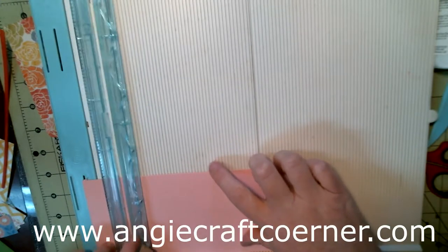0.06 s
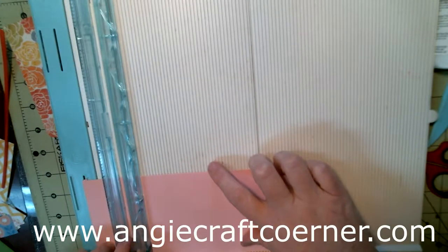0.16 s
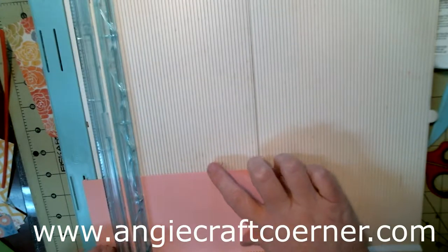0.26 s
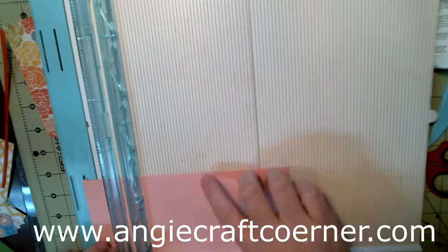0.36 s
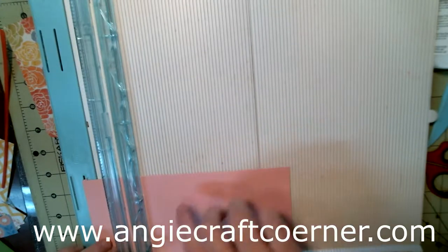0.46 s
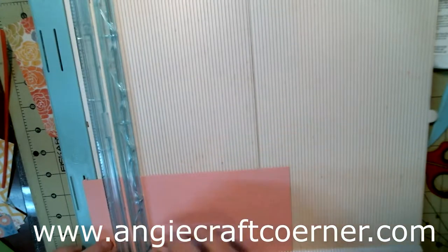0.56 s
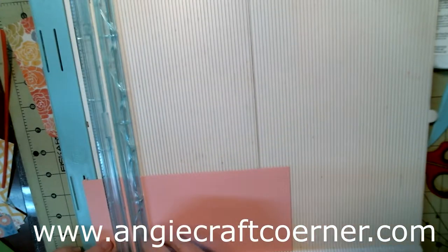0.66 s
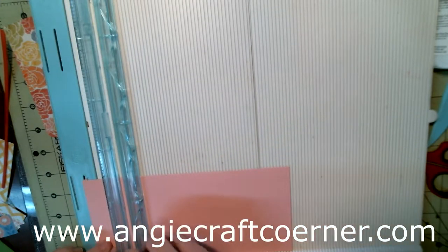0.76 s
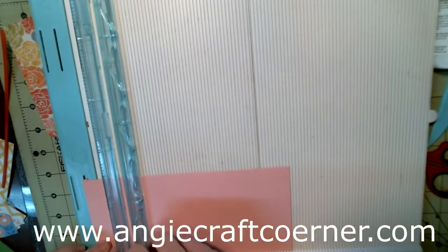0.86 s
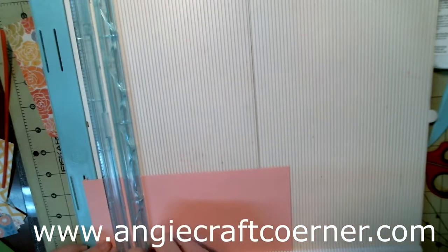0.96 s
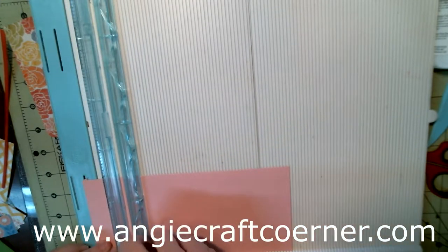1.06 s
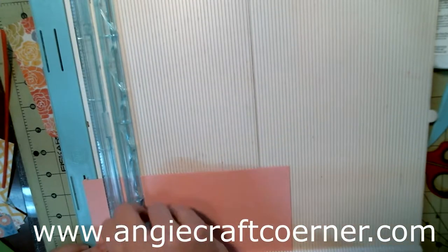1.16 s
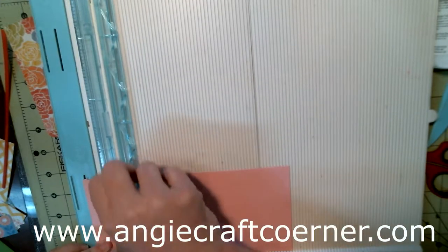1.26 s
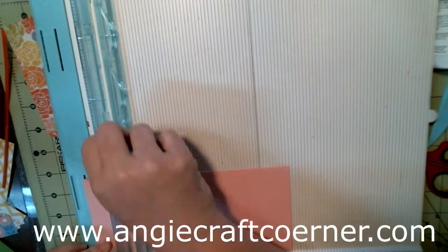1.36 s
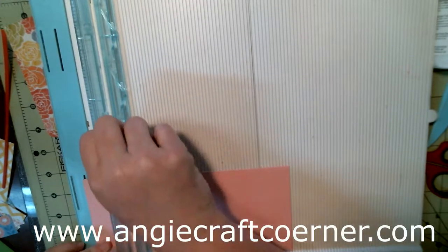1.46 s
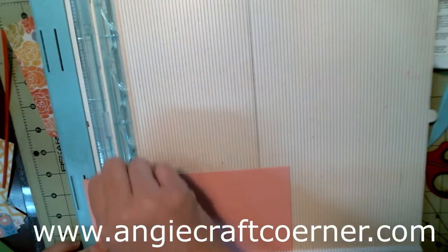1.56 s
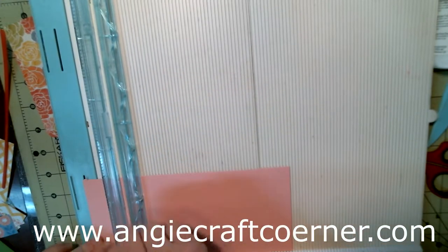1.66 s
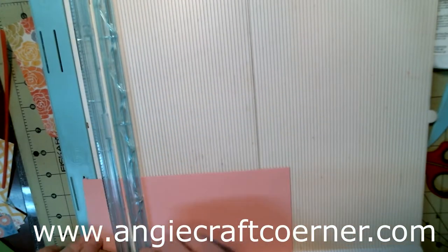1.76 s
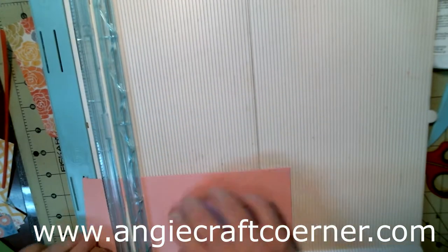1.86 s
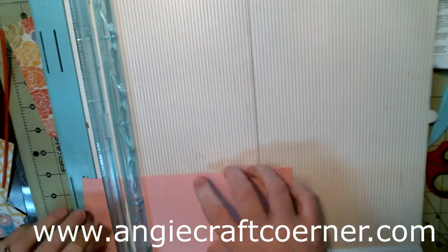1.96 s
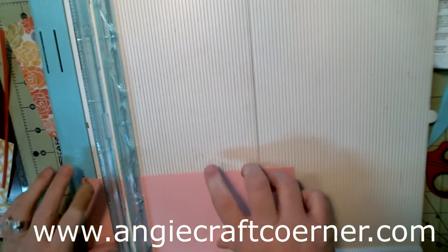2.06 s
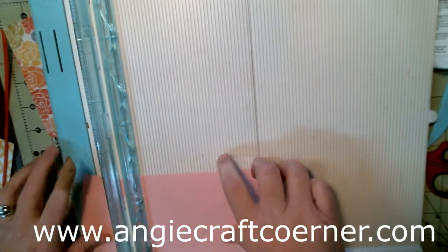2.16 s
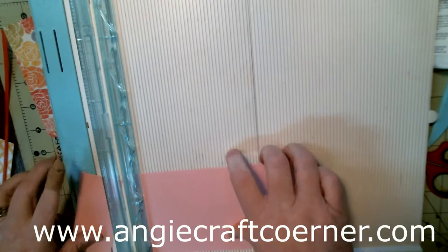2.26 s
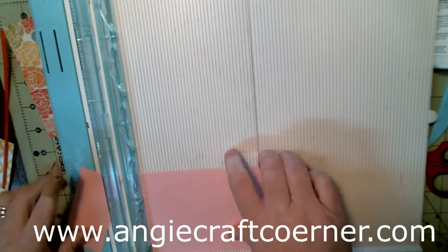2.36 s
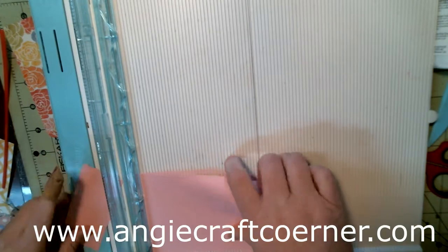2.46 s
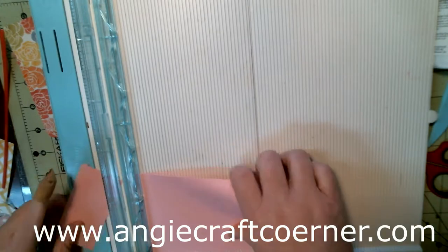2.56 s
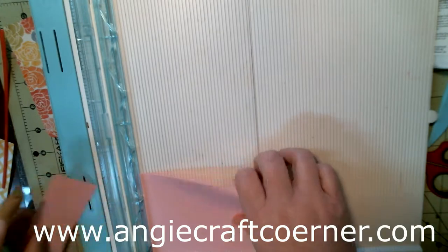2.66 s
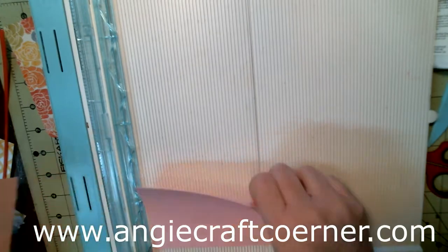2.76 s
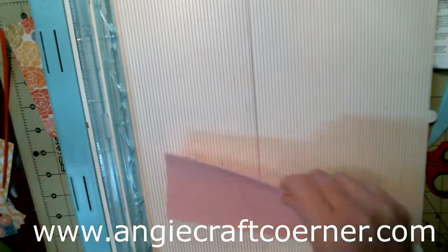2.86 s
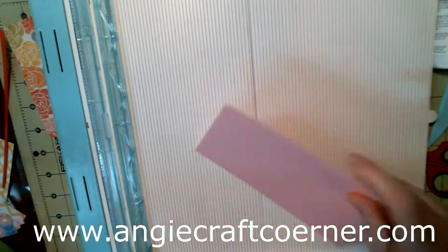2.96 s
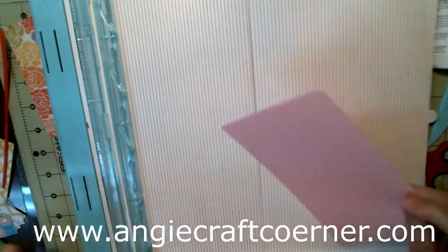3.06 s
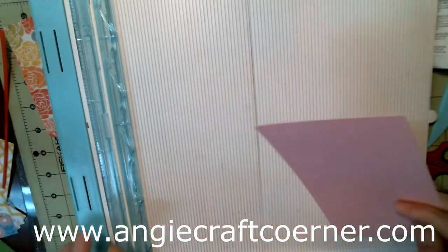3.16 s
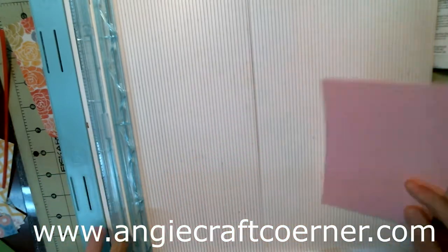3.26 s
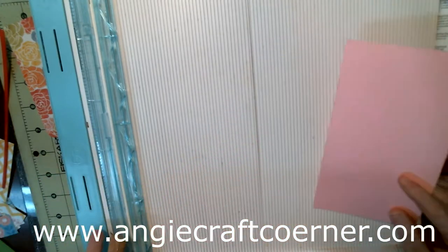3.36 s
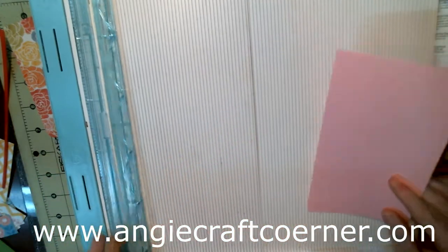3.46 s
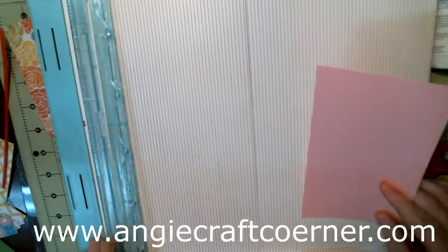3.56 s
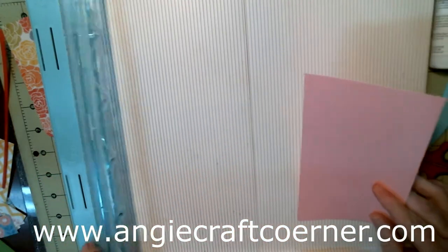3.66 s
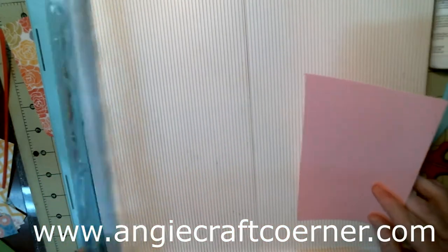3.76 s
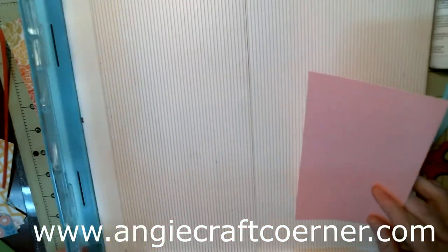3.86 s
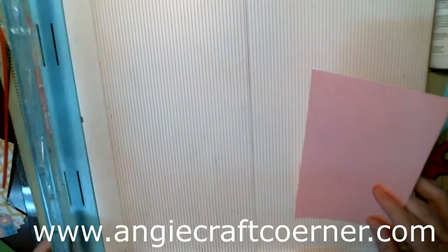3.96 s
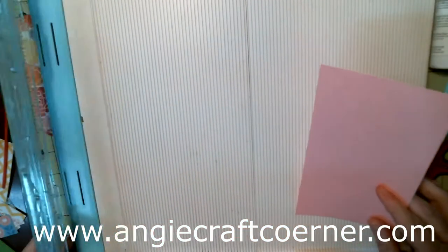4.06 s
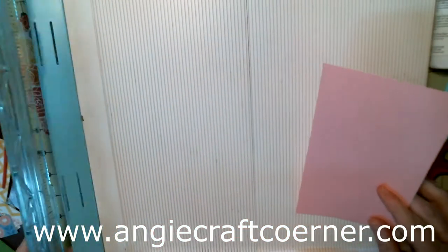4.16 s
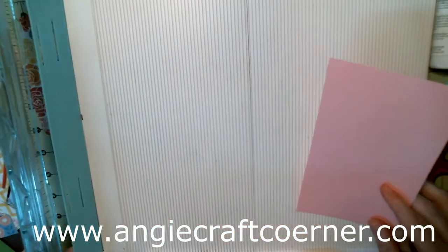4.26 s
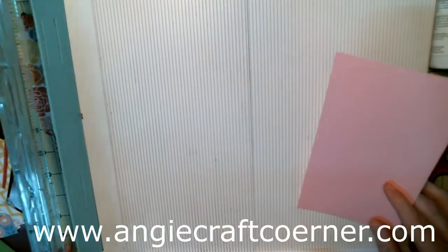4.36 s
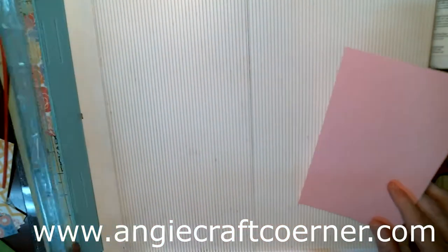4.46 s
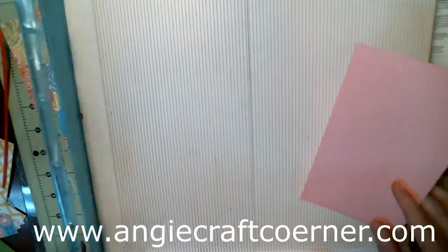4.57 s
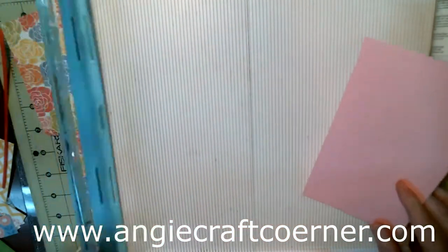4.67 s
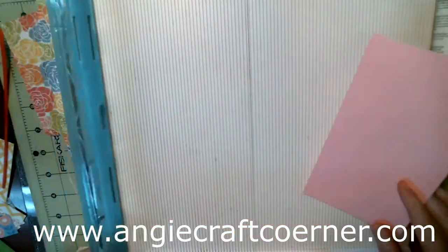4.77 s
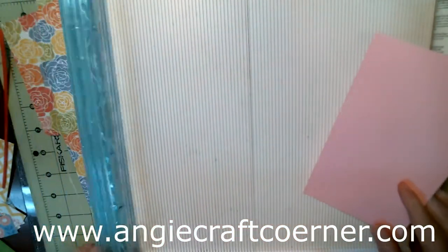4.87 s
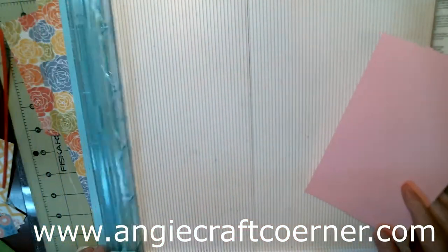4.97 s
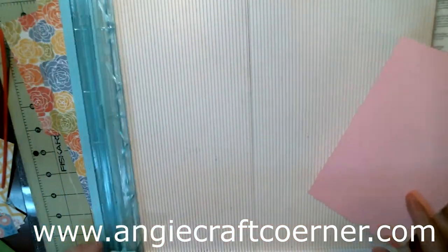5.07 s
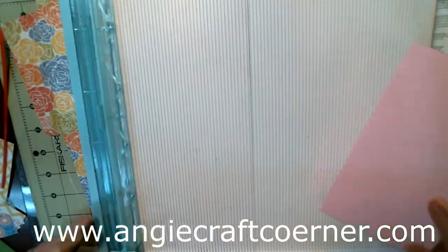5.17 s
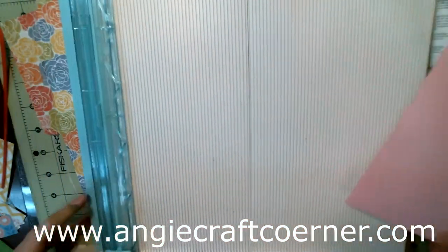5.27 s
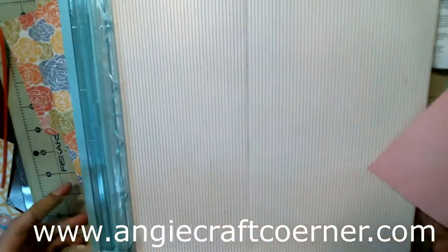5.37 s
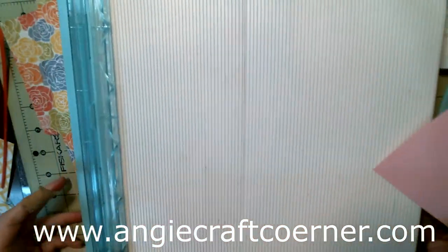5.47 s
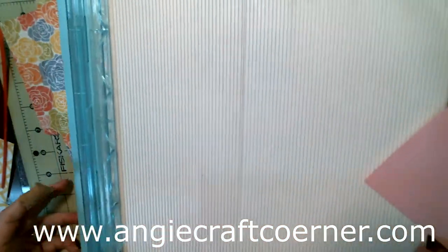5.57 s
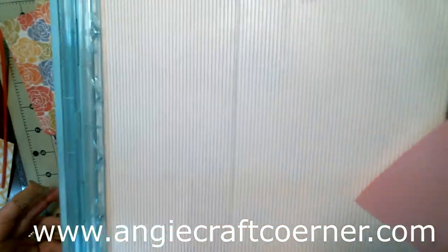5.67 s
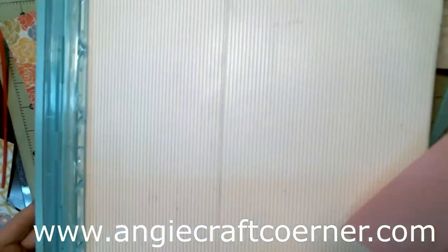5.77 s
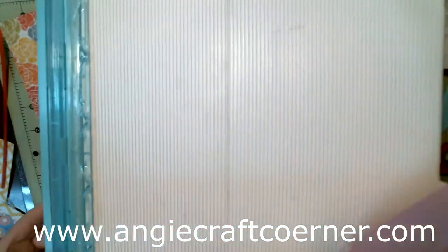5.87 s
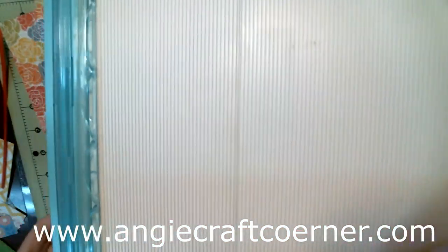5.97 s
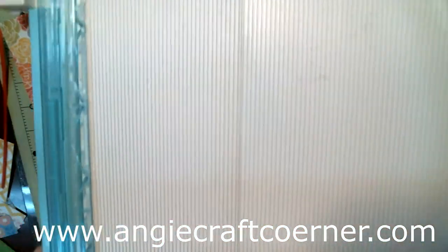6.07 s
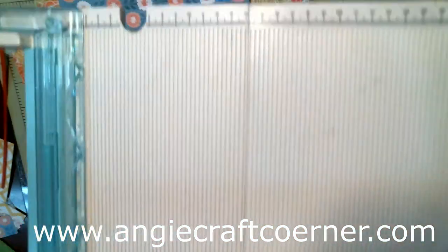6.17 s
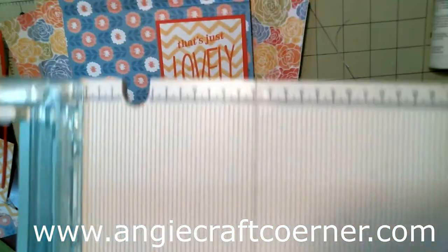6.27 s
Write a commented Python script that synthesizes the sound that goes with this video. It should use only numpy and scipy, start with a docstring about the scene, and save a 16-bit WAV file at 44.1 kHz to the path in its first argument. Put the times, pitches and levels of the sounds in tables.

```python
"""A craft table in a dry room, a plastic paper trimmer on it, a small microphone close by.
A low electric hum lies under taps of fingers, card and plastic, which sound board, clack and edge tick.
A blade rips through cardstock as clumped tiny slips ringing the rail, and is pushed back against its stop.
Hands slide the card away (swelling strokes of friction), the trimmer's arm flops open and claps shut
(spike, rattle and room through ringing modes), and the board is nudged aside with low, padded bumps."""
import sys
import numpy as np
from scipy import signal
from scipy.fft import rfft, irfft, next_fast_len
from scipy.io import wavfile
from scipy.ndimage import map_coordinates

SR = 44100
rng = np.random.default_rng(int(sys.argv[2]) if len(sys.argv) > 2 else 0)


def wav_record(signal):
    """Record a signal, one row per channel, as 16-bit PCM in the file named by sys.argv[1]."""
    frames = np.transpose(np.atleast_2d(signal))
    bounded = np.clip(frames, -1, 1)
    # unit amplitude maps onto the largest positive 16-bit level
    quanta = np.round(bounded * 32767).astype(np.int16)
    wavfile.write(sys.argv[1], SR, quanta)


N = 278579
TIME = np.arange(N) / SR
HIT = np.arange(SR // 4) / SR  # clock of one short blow


def amp(db):
    """Decibels to gain."""
    return 10 ** (np.asarray(db) / 20)


def unit(x):
    """Scale to rms 1."""
    return x / np.sqrt(np.mean(x ** 2) + 1e-20)


def blow_unit(x):
    """Scale a blow to the energy of 20 ms at rms 1."""
    return x / np.linalg.norm(x) * np.sqrt(SR / 50)


def along(points, hz):
    """Read (f/Hz, value) points on a log frequency axis."""
    f, value = np.transpose(points)
    return np.interp(np.log(hz + 1), np.log(f + 1), value)


def wobble(rate, size=N):
    """A smooth random curve, rate knots a second."""
    knots = rng.standard_normal(int(size * rate / SR) + 4)
    return map_coordinates(knots, [TIME[:size] * rate])


def colour(x, spectrum, modes=()):
    """Minimum-phase filter: a broad spectrum lifted by narrow resonances, ringing only after the blow."""
    size = 2 * next_fast_len(len(x) // 2 + 4096)
    hz = np.fft.rfftfreq(size, 1 / SR)
    gain = amp(along(spectrum, hz))
    for centre, width, lift_db in modes:
        resonance = 1 / (1 + (2 * (hz - centre) / width) ** 2)
        gain = gain * np.sqrt(1 + (amp(lift_db) ** 2 - 1) * resonance)
    # folding the cepstrum onto positive time makes the filter causal
    cepstrum = irfft(np.log(gain + 1e-6))
    cepstrum[1:size // 2] *= 2
    cepstrum[size // 2 + 1:] = 0
    response = np.exp(rfft(cepstrum))
    return irfft(rfft(x, size) * response)[:len(x)]


def add(track, s, sound):
    """Mix a sound into the track at time s."""
    part = track[round(s * SR):][:len(sound)]
    part += sound[:len(part)]


def burst(t60, rise=1e-5):
    """Dying noise of energy 1."""
    envelope = (1 - np.exp(-HIT / rise)) * np.exp(-np.log(1000) * HIT / t60)
    x = rng.standard_normal(len(HIT)) * envelope
    return x / np.linalg.norm(x)


def contact(rise, t60, rattle_db, room_db):
    """One spike, the chatter of the touching parts, and the small room's answer."""
    rattle = amp(rattle_db) * burst(t60, rise)
    room = amp(room_db) * burst(t60=.125, rise=.002)
    x = rattle + room
    x[0] += 1
    return x


def friction(size, rate, spread_db, clump_db, ring_db):
    """Tiny slips of random size come in clumps and ring the surface briefly."""
    slips = (rng.random(size) < rate / SR) * rng.standard_normal(size)
    clumps = clump_db * wobble(rate=110, size=size)
    slips = slips * amp(spread_db * rng.standard_normal(size) + clumps)
    ring = contact(rise=.0002, t60=.012, rattle_db=ring_db, room_db=-3)
    return signal.fftconvolve(slips, ring)[:size]


# One rubbed patch's resonance: offset from centre [half widths], level/dB
PATCH_SHAPE = [(-4, -48), (-2, -17), (-1, -4), (0, 0), (1, -5), (2, -21), (4, -56)]


def hump(centre_hz, octaves):
    """The spectrum of a rubbed patch: one broad resonance, half width in octaves."""
    return [(centre_hz * 2 ** (step * octaves), level) for step, level in PATCH_SHAPE]


# Modes of the trimmer's base, under strokes and taps alike: f/Hz, width/Hz, lift/dB
BASE_MODES = [(483, 30, 7), (615, 35, 8), (726, 30, 6), (852, 35, 5), (1124, 50, 6), (1250, 50, 6)]


def stroke(length, spectrum, crest, swell):
    """A stroke speeds up to its crest (a share of its length) and slows, rasping through the spectrum."""
    phase = np.interp(TIME[:SR // 2] / length, [0, crest, 1], [0, 1, 0])
    speed = np.sin(np.pi / 2 * phase) ** swell
    slips = friction(SR // 2, rate=2800, spread_db=3.8, clump_db=3, ring_db=0)
    return speed * unit(colour(slips, spectrum, BASE_MODES))


# Room tone at the microphone: f/Hz, level/dB per Hz
ROOM_TONE = [(25, -31), (60, -21), (90, -8), (140, -1), (200, -3), (250, -1), (340, -8), (520, -8),
             (780, -9), (1200, -17), (1800, -22), (3200, -29), (8000, -39), (15500, -49)]
HUM_HZ = 109.6


def background(air_db=-68, hum_db=-67.7):
    """Dull room noise and a hum slightly unsteady in pitch and level."""
    phase = 2 * np.pi * np.cumsum(HUM_HZ + .9 * wobble(rate=6)) / SR
    hum = unit(np.sin(phase) * amp(1.15 * wobble(rate=7)))
    air = unit(colour(rng.standard_normal(N), ROOM_TONE))
    return amp(hum_db) * hum + amp(air_db) * air


# Light taps of fingers, card and plastic, close by:
# t/s, clack level/dB, clack pitch f/Hz, board level/dB re clack, clack t60/s
LIGHT_TAPS = [(.048, -67, 3000, -7, .05), (.101, -55, 5200, -16, .025), (.113, -56, 2600, -6, .07),
              (.603, -70, 3700, 2, .07), (.734, -56, 3800, 3, .03), (1.371, -41, 1850, -12, .05),
              (1.524, -42, 3200, -29, .023), (1.63, -70, 5800, -6, .04), (1.711, -56, 2700, -8, .08),
              (1.778, -52, 1700, 4, .115), (1.870, -45.5, 2700, -2, .07), (2.158, -54, 2300, -7, .06),
              (2.279, -54, 3900, -15, .06), (2.389, -57, 2300, -12, .06), (2.409, -46, 2300, -13, .035),
              (2.95, -53, 4300, -11, .035), (3.048, -59, 1700, 5, .06), (3.184, -41.5, 3200, -33, .018),
              (3.221, -49.5, 2600, -24, .06), (3.574, -62, 1750, -5, .09), (3.932, -53, 1750, 7, .06),
              (3.980, -60, 2700, -4, .09), (4.009, -57, 1900, -3, .08), (4.383, -39, 2400, -12, .025),
              (4.992, -54.5, 2400, -2, .09), (5.205, -66, 2600, -5, .08), (5.227, -63.5, 5000, -7, .06),
              (5.455, -51, 3200, -1, .05), (5.474, -55, 2100, 5, .05), (5.541, -59.5, 4200, -7, .05),
              (6.111, -75, 6000, -2, .06)]
# The board under a tap: f/Hz, level/dB per Hz
BOARD_COLOUR = [(100, -42), (250, -20), (400, -16), (520, -4), (630, 0), (800, -1), (950, -2), (1150, -8),
                (1700, -28), (4000, -70)]
# The clack of plastic and card: f [multiple of its pitch], level/dB per Hz
CLACK_COLOUR = [(.2, -45), (.42, -14), (.65, -3), (1, 0), (1.45, -5), (2.1, -13), (3.2, -32), (6, -70)]
# The thin tick of an edge: f/Hz, level/dB per Hz
EDGE_COLOUR = [(2500, -45), (5000, -6), (6800, 0), (9500, -1), (11500, -10), (13500, -24), (16000, -46)]
# A higher tap has more edge tick: dB re the clack at a reference pitch, and growth with pitch
EDGE_DB, EDGE_REF_HZ, EDGE_DB_PER_OCTAVE = -11.5, 3000, 12
# A slower tap skids more as it lands: dB re the clack at a reference t60, and growth with t60
SKID_DB, SKID_REF_S, SKID_DB_PER_DOUBLING = -11, .05, 6
SKID_LEAD_S, SKID_S = .035, .085  # start ahead of the tap, length


def taps(softness=.018):
    """Long touches swell slower and skid more; board, clack and edge tick each die sooner than the last."""
    track = np.zeros(N)
    for s, db, pitch_hz, board_db, t60 in LIGHT_TAPS:
        clack = [(pitch_hz * multiple, level) for multiple, level in CLACK_COLOUR]
        edge_db = EDGE_DB + EDGE_DB_PER_OCTAVE * np.log2(pitch_hz / EDGE_REF_HZ)
        voices = ((BOARD_COLOUR, board_db, 1.3 * t60), (clack, 0, t60), (EDGE_COLOUR, edge_db, .7 * t60))
        for voice, share_db, life in voices:
            touch = contact(softness * life, life, rattle_db=11, room_db=2.5)
            add(track, s, amp(db + share_db) * blow_unit(colour(touch, voice, BASE_MODES)))
        skid_db = SKID_DB + SKID_DB_PER_DOUBLING * np.log2(t60 / SKID_REF_S)
        skid = stroke(SKID_S, clack, crest=.6, swell=2.6)
        add(track, s - SKID_LEAD_S, amp(db + skid_db) * skid)
    return track


# Skin and card brushing over paper: start t/s, length/s, level/dB
PAPER_BRUSHES = [(.46, .12, -68), (1.19, .28, -55.5), (1.60, .13, -65), (1.72, .11, -62.5), (1.83, .2, -63),
                 (2.17, .11, -61), (2.26, .31, -56.5)]
# Their hiss: f/Hz, level/dB per Hz
BRUSH_HISS = [(500, -45), (1500, -25), (3500, -17), (5500, -11), (7800, -1), (9800, 0), (12000, -8),
              (15500, -20)]
# The slider runs back, the card drags out and settles, the arm lifts, turns and seats, the board shifts:
# start t/s, length/s, level/dB, centre f/Hz, half width/octaves
DRAGGED_EDGES = [(.475, .06, -68, 2600, .5), (1.21, .25, -57.5, 3100, .7), (1.275, .055, -59, 1580, .15),
                 (2.02, .22, -51, 2500, .95), (2.2, .14, -63, 3400, .9), (2.42, .11, -57, 4700, .4),
                 (2.45, .33, -72, 3600, 1), (2.94, .058, -54, 3000, .9), (3.37, .065, -56, 1400, .7),
                 (3.868, .11, -54, 1300, .7), (4.345, .05, -55, 2400, .8), (4.58, .13, -72, 3300, .45),
                 (4.703, .06, -36, 2000, 1.2), (5.41, .135, -54, 3100, .6), (5.57, .1, -69, 2000, .7),
                 (6.14, .08, -73, 3600, .35)]
# Low, narrow rubs of pressing fingertips and of the nudged board:
# middle t/s, length/s, level/dB, centre f/Hz
LOW_RUBS = [(1.689, .06, -55, 680), (1.85, .06, -59, 660), (1.975, .045, -54, 610),
            (2.072, .11, -53.5, 720), (5.365, .09, -55, 260), (5.482, .1, -46.5, 440),
            (5.997, .04, -57, 650)]


def slides():
    """Flat brushes hiss, dragged edges rasp in the middle, fingertips and the nudged board rub low."""
    track = np.zeros(N)
    for start, length, db in PAPER_BRUSHES:
        add(track, start, amp(db) * stroke(length, BRUSH_HISS, crest=.55, swell=2.1))
    for start, length, db, centre_hz, octaves in DRAGGED_EDGES:
        add(track, start, amp(db) * stroke(length, hump(centre_hz, octaves), crest=.46, swell=1.9))
    for middle, length, db, centre_hz in LOW_RUBS:
        rub = stroke(length, hump(centre_hz, octaves=.34), crest=.45, swell=2.2)
        add(track, middle - length / 2, amp(db) * rub)
    return track


# The cutting stroke, pressed hardest just before the blade leaves the card: t/s, level/dB
CUT_LEVEL = [(0.68, -86), (0.726, -62), (0.734, -44), (0.8, -49), (0.896, -42), (0.994, -41), (1.024, -60),
             (1.068, -58), (1.098, -80), (1.12, -75)]
# Tearing fibres: f/Hz, level/dB per Hz
FIBRE_COLOUR = [(150, -36), (380, -19), (500, -5), (800, -8), (1200, -10.5), (2000, -8.5), (2800, -5.5),
                (4200, -11), (5200, -15), (7500, -14), (9500, -15), (11500, -22), (13500, -31),
                (15500, -44)]
# Rail resonances excited by the blade: f/Hz at the start of the cut, f/Hz at its end, width/Hz, lift/dB
RAIL_MODES = [(650, 585, 50, 14), (530, 480, 40, 7), (1710, 1620, 90, 4), (2700, 2950, 450, 3.5),
              (8700, 9400, 550, 10)]


def cut():
    """The blade snaps fibres; the rail's resonances shift as the slider travels."""
    s, db = np.transpose(CUT_LEVEL)
    level = amp(np.interp(TIME, s, db, left=-120, right=-120))
    travel = np.interp(TIME, [.84, 1.0], [0, 1])
    snaps = friction(N, rate=5000, spread_db=2.6, clump_db=1.8, ring_db=-6)
    start_modes = [(hz, width, lift) for hz, _, width, lift in RAIL_MODES]
    end_modes = [(hz, width, lift) for _, hz, width, lift in RAIL_MODES]
    at_start = unit(colour(snaps, FIBRE_COLOUR, start_modes))
    at_end = unit(colour(snaps, FIBRE_COLOUR, end_modes))
    return level * ((1 - travel) * at_start + travel * at_end)


# Loud blows on the plastic, by name:
# t/s, level/dB, rise/s, contact t60/s, rattle level/dB re first spike, room level/dB re first spike
LOUD_BLOWS = {"stop": (1.432, -20, .0005, .0125, 13, -1.5), "card": (3.3545, -35.5, .0005, .028, 11, 2.5),
              "open": (4.3932, -21.3, .0005, .035, 2, -4), "shut": (4.7085, -19.3, .0025, .025, 22, 17.5)}
# Colour of each blow, by name: f/Hz, level/dB per Hz
BLOW_COLOURS = { "stop": [(120, -45), (400, -22), (750, -5), (1300, -9), (1800, -5), (3000, -3), (4100, -2),
                (4800, -13), (5500, -9), (8800, -11), (11000, -26), (15500, -46)], "card": [(120, -42),
                (400, -15), (630, 0), (1100, -3), (1500, -6), (2300, -3), (3800, -7), (5500, -11),
                (9500, -11), (12000, -22), (15500, -44)], "open": [(120, -52), (250, -25), (450, -10),
                (650, -5), (950, -13), (1400, -7.5), (2100, -16), (3200, -20), (5000, -18), (9500, -22),
                (13000, -28), (15500, -44)], "shut": [(120, -50), (220, -22), (560, -7), (1000, -6.5),
                (1250, -4), (2100, -8), (2800, -2), (4000, -4), (5000, -14), (8500, -11), (11400, -20),
                (15500, -38)]}
# Modes that each blow rings, by name: f/Hz, width/Hz, lift/dB
BLOW_MODES = { "stop": [(829, 70, 7), (1820, 70, 4), (3100, 120, 4), (4030, 200, 7), (5430, 150, 5),
              (6800, 200, 5)], "card": [(615, 35, 7), (726, 30, 6), (852, 35, 5), (1124, 50, 6)],
              "open": [(486, 25, 6), (614, 34, 14), (726, 32, 8), (852, 30, 7), (1112, 35, 5),
              (1250, 35, 8), (1650, 40, 6), (1924, 35, 7), (3380, 40, 7), (7400, 300, 8)],
              "shut": [(366, 22, 7), (618, 45, 7), (828, 30, 5), (1240, 50, 5), (1732, 35, 9),
              (2060, 70, 4), (2600, 140, 5), (2756, 65, 7), (3400, 40, 4), (4000, 60, 6), (4850, 40, 5)]}
# A faint short noise swells just ahead of each loud blow: dB re the blow, length, centre, half width
LEAD_IN_DB, LEAD_IN_S, LEAD_IN_HZ, LEAD_IN_OCTAVES = -30, .024, 3400, .7


def blows():
    """The slider hits its stop; the card slaps the board; the hinged arm falls open and is shut again."""
    track = np.zeros(N)
    for name, (s, db, rise, t60, rattle_db, room_db) in LOUD_BLOWS.items():
        impact = contact(rise, t60, rattle_db, room_db)
        ringing = colour(impact, BLOW_COLOURS[name], BLOW_MODES[name])
        add(track, s, amp(db) * blow_unit(ringing))
        lead_in = stroke(LEAD_IN_S, hump(LEAD_IN_HZ, LEAD_IN_OCTAVES), crest=.65, swell=2.2)
        add(track, s - .8 * LEAD_IN_S, amp(db + LEAD_IN_DB) * lead_in)
    return track


# Soft bumps on the table: t/s, level/dB, pitch f/Hz
TABLE_BUMPS = [(2.578, -57, 240), (4.262, -57, 250), (5.345, -56, 240), (5.840, -44.5, 198),
               (6.147, -58, 245)]
# Fainter ones come by chance as the hands shift: middle of their level and pitch ranges
FAINT_BUMP_DB, FAINT_BUMP_HZ = -63, 260


def bumps(rise=.012, t60=.09, count=12):
    """Padded pushes swell slowly into one low mode of the table."""
    track = np.zeros(N)
    shape = (1 - np.exp(-(HIT / rise) ** 2)) * np.exp(-np.log(1000) * HIT / t60)
    faint = []
    for when, force, place in rng.random((count, 3)):
        db = FAINT_BUMP_DB + 5 * (force - .5)
        hz = FAINT_BUMP_HZ * 2 ** (.4 * (place - .5))
        faint.append((when * N / SR, db, hz))
    for s, db, hz in TABLE_BUMPS + faint:
        add(track, s, amp(db) * blow_unit(shape * np.sin(2 * np.pi * hz * HIT)))
    return track


# The extreme treble of cut and strokes is rolled off: f/Hz, level/dB
TREBLE_ROLLOFF = [(10000, 0), (12000, -3), (13500, -10), (16000, -26)]


def scene():
    """Everything on the table, heard from one point close by."""
    rolled_off = colour(cut() + slides(), TREBLE_ROLLOFF)
    return (background() + taps() + rolled_off + blows() + bumps())[None]


def record(dry):
    """The microphone keeps nothing at or above its band limit of 15900 Hz."""
    size = next_fast_len(N + SR // 2)
    in_band = np.fft.rfftfreq(size, 1 / SR) < 15900
    return irfft(rfft(dry, size) * in_band, size)[:, :N]


dry = scene()
out = record(dry)
wav_record(out)
```